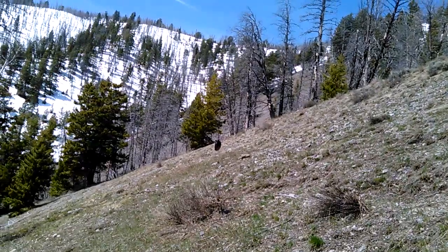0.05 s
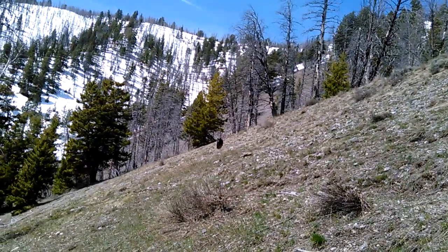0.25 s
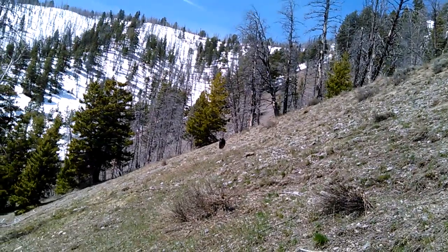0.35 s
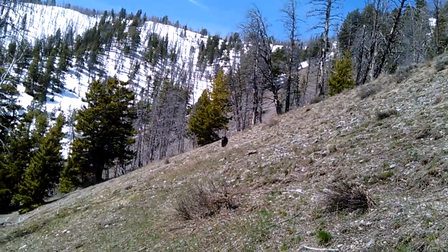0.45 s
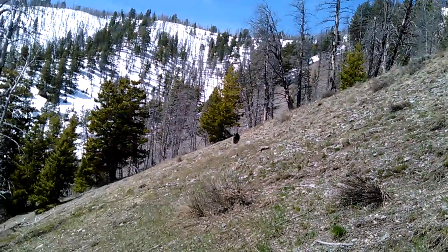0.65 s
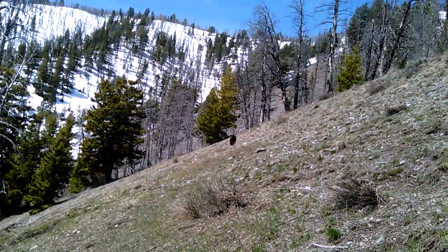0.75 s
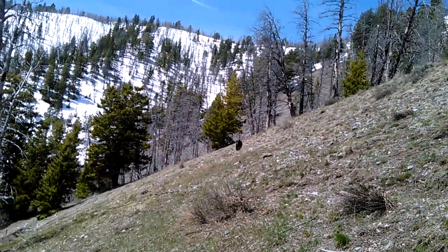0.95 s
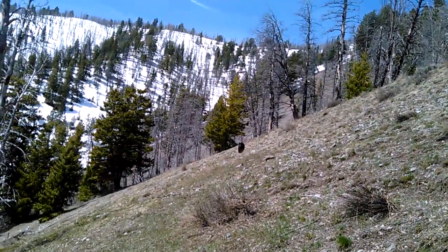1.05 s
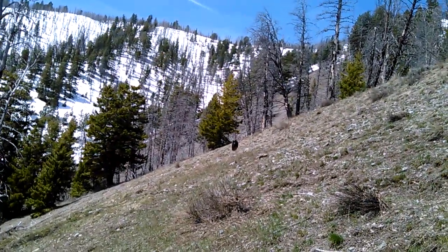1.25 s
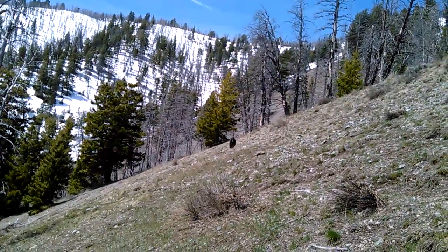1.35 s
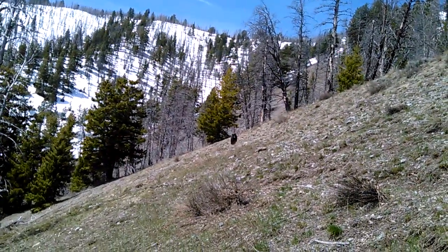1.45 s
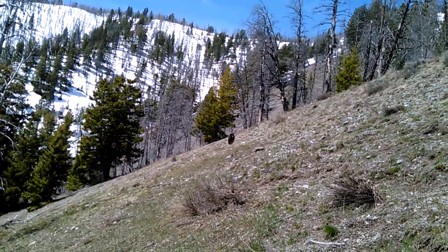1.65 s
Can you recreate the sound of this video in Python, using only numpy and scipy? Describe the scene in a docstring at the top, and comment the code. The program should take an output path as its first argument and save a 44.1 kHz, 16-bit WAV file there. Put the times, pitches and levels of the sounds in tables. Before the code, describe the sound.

Wind buffets the microphone on a mountain slope: a quick cluster of deep thuds, a softer fluttering rumble, then another thump. Far behind it, air hisses softly and a distant bird chirps very faintly toward the end.

```python
"""Wind on a mountainside

Wind rumbles on the microphone, and stronger eddies (swirls of air) thump it. The hardest ones
add a deep thud and a dull tick. Behind this the far air hisses, something dry rustles briefly
and a distant bird gives a few sliding chirps."""
import sys
import numpy as np
from scipy import signal
from scipy.io import wavfile

SR = 44100
rng = np.random.default_rng(int(sys.argv[2]) if len(sys.argv) > 2 else 0)


def store_pcm(level_fs):
    """Save levels as 16-bit WAV."""
    pcm = np.round(np.clip(level_fs, -1, 1) * 32767).astype(np.int16)
    wavfile.write(sys.argv[1], SR, np.atleast_2d(pcm).T)


N = 74970
TIME = np.arange(N) / SR


def wind_rumble():
    """Rough air flowing over the microphone rumbles; a weaker flow is quieter and duller."""
    # strength of the flow (time [s], level [dB])
    flow = [(0, -41), (.025, -33), (.115, -37), (.14, -36), (.25, -26.5), (.34, -24), (.41, -43.5),
            (.445, -36.5), (.485, -37.5), (.59, -35.5), (.66, -33.5), (.84, -32.5), (.93, -36),
            (1.04, -26.5), (1.13, -29.5), (1.185, -42.5), (1.232, -24.5), (1.275, -43), (1.33, -35),
            (1.395, -46), (1.46, -27.5), (1.525, -38.5), (1.6, -33.5), (1.675, -37.5), (1.7, -42.5)]
    # tone of the rumble (frequency [Hz], relative level [dB])
    spectrum = [(30, -22), (39, -11.5), (52, 19.5), (90, -5.5), (160, 2.5), (260, -30.5), (400, -45),
                (650, -42.5), (1200, -56.5)]
    strong_flow_db, flutter_db, upper_hz = -23.5, 4, 300
    flow_db = np.interp(TIME, *np.transpose(flow))
    # bands above upper_hz flutter and follow the flow by this extra amount, lower ones less so
    upper_db = flutter_db * drift(25) + 0.32 * (flow_db - strong_flow_db)
    bands = noise_bands(spectrum, steady=True)
    noise = sum(band * from_db(upper_db * min(hz / upper_hz, 1)) for hz, band in bands)
    return from_db(flow_db + 1) * noise


def eddy_thumps():
    """Each eddy hits the microphone as a short swell of low noise with its own brightness."""
    # eddies (time [s], rise time [s], level [dB], brightness [dB per octave])
    eddies = [(.016, 0.0088, -28, 2.5), (0.07, 0.0033, -36, 1), (0.145, 0.0068, -26, -5),
              (0.179, 0.0045, -21, 0.5), (0.209, 0.0094, -19, 4), (.289, 0.007, -17, 2.7),
              (0.317, 0.011, -21.5, 2.5), (0.348, .003, -18.5, 2), (0.371, 0.0058, -7, 3.5),
              (0.378, 0.003, -15.5, 3.5), (0.403, 0.0058, -20, 0.5), (0.491, 0.0099, -34.5, .5),
              (0.54, 0.011, -32.5, 7.5), (0.633, 0.0059, -22, 0.5), (.687, 0.022, -34, 1.5),
              (0.744, 0.005, -28, -0.5), (0.798, 0.01, -25, -3.5), (0.85, 0.03, -34.5, -0.5),
              (0.988, 0.02, -28, -2.5), (1.076, 0.0054, -21.5, -1), (1.12, 0.0073, -25, 2.5),
              (1.223, 0.015, -30.5, 0), (1.268, 0.0061, -39, 2), (1.426, 0.0046, -25, 0),
              (1.45, 0.013, -18.5, 1.35), (1.474, 0.012, -27.5, 2), (1.567, 0.012, -29.5, -4),
              (1.624, .014, -32.5, -1.5), (1.661, 0.019, -31.5, -8.5)]
    # tone of a thump (frequency [Hz], relative level [dB])
    spectrum = [(30, -25), (45, -8.5), (85, 2), (150, -3), (250, -13), (450, -25), (780, -51),
                (1100, -73.5), (2500, -87.5)]
    # borders between the low, middle and high groups of bands (frequency [Hz])
    borders = [110, 320]
    boost_db, pivot_hz, top_hz = 2.5, 93, 700
    hz, bands = map(np.array, zip(*noise_bands(spectrum, steady=True)))
    octaves = np.log2(np.minimum(hz, top_hz) / pivot_hz)
    groups = np.digitize(hz, borders)
    out = np.zeros(N)
    for at, rise_s, db, brightness in eddies:
        shape = swell(at, rise_s, fall_stretch=1.18)
        gains = from_db(boost_db + db + brightness * octaves)
        for group in np.unique(groups):
            noise = ((groups == group) * gains) @ bands
            # keep the thump's strength the same whatever the noise does at that moment
            power_in_swell = np.average(noise ** 2, weights=shape ** 2)
            out += shape * noise * np.sqrt(np.mean(noise ** 2) / power_in_swell)
    return out


def deep_thuds():
    """A large eddy pushes and pulls the microphone's thin membrane about once."""
    # pressure swings in the hardest eddies (time [s], level [dB], pitch [Hz])
    swings = [(.214, -15.5, 76), (.294, -7.5, 68), (0.382, -5.5, 85.4), (1.43, -13, 65.3),
              (1.457, -12.5, 70)]
    half_length_cycles = 0.7
    out = np.zeros(N)
    for at, db, hz in swings:
        cycles = (TIME - at) * hz
        shape = np.exp(-(cycles / half_length_cycles) ** 2)
        out -= from_db(db) * shape * np.sin(2 * np.pi * cycles)
    return out


def dull_ticks():
    """A sudden kink in air pressure: one low swing that starts sharply and dies at once."""
    # kinks in the hardest eddies (time [s], level [dB], treble cutoff [Hz])
    kinks = [(0.2104, -19, 3500), (0.2867, -15.5, 6000), (.3820, -10, 3800), (0.3971, -19, 3950),
             (1.4423, -23.5, 4920), (1.453, -28.5, 3000)]
    body_hz = 258.3
    out = np.zeros(N)
    for at, db, cutoff_hz in kinks:
        phase = 2 * np.pi * body_hz * np.maximum(TIME - at, 0)
        kink = np.e * phase * (1 - phase / 2) * np.exp(-phase)
        out += from_db(db) * filtered(kink, 2, cutoff_hz, "low")
    return out


def far_air():
    """Wind over the slope and trees makes a smooth hiss."""
    # tone of the hiss (frequency [Hz], relative level [dB])
    spectrum = [(100, -2.5), (500, -2.5), (1000, -2.5), (2000, -10), (3200, -14.5), (5000, -18.5),
                (7800, -20.5), (10500, -22), (14000, -24.5)]
    return from_db(-64) * sum(band for hz, band in noise_bands(spectrum))


def dry_rustle():
    """Faint swishes of high noise, made grainy by a fast flicker in level."""
    # swishes (time [s], rise time [s], level [dB])
    swishes = [(.83, 0.079, -73), (0.94, 0.043, -80), (1.079, 0.027, -75.5), (1.37, 0.024, -78)]
    # tone of the rustle (frequency [Hz], relative level [dB])
    spectrum = [(2500, -10), (5000, 0), (7500, 4.5), (10000, -2), (14000, -18)]
    level = sum(from_db(db) * swell(at, rise_s) for at, rise_s, db in swishes)
    grain = from_db(3 * drift(90))
    return level * grain * sum(band for hz, band in noise_bands(spectrum))


def distant_bird():
    """A bird whistles almost pure notes, each sliding smoothly through three pitches."""
    # notes (time [s], length [s], start [Hz], middle [Hz], end [Hz], relative level [dB])
    chirps = [(1.315, .033, 4250, 3480, 3000, 0), (1.344, .029, 3950, 3020, 2750, -2),
              (1.400, .027, 2500, 3950, 3850, -2.5), (1.589, .052, 3800, 2660, 3200, .5)]
    bird_db, flicker_db = -67.5, 1.2
    out = np.zeros(N)
    for at, length, start_hz, middle_hz, end_hz, db in chirps:
        progress = np.clip((TIME - at) / length, 0, 1)
        curve = np.polyfit([0, .5, 1], [start_hz, middle_hz, end_hz], 2)
        hz = np.polyval(curve, progress)
        level = from_db(bird_db + db + flicker_db * drift(92))
        shape = np.sqrt(np.abs(np.sin(np.pi * progress)))
        out += level * shape * np.sin(2 * np.pi * np.cumsum(hz) / SR)
    return out


def from_db(db):
    """Turn decibels into a number to multiply by."""
    return 10 ** (np.asarray(db) / 20)


def unit_power(x):
    """Scale a wave so that its average power is 1."""
    return x / np.sqrt(np.mean(x ** 2) + 1e-20)


def filtered(x, order, hz, kind):
    """Keep the "low", "high" or "band" part of a wave; a higher order cuts more steeply."""
    return signal.sosfilt(signal.butter(order, hz, kind, fs=SR, output="sos"), x)


def drift(rate_hz):
    """A smooth random wander, typically about 1 in size."""
    step, warm_up = 40, 2000
    memory = np.exp(-2 * np.pi * rate_hz * step / SR)
    noise = rng.standard_normal(N // step + warm_up + 2)
    slow = signal.lfilter([1], [1, -2 * memory, memory ** 2], noise)[warm_up:]
    return np.interp(np.arange(N) / step, np.arange(len(slow)), unit_power(slow))


def noise_bands(spectrum, steady=False):
    """Give half-octave slices of noise as (centre [Hz], wave); their powers add up to 1."""
    hz, db = np.transpose(spectrum)
    edges = 20 * 2 ** np.arange(0, 9.6, .5)
    centres = np.sqrt(edges[1:] * edges[:-1])
    power = from_db(np.interp(np.log(centres), np.log(hz), db)) ** 2 * np.diff(edges)
    power *= (edges[1:] > hz[0]) & (edges[:-1] < hz[-1])
    for k in np.flatnonzero(power):
        band = filtered(rng.standard_normal(2 * N), 2, edges[k:k + 2], "band")
        if steady:  # flatten the noise's own swells
            band = band / np.abs(signal.hilbert(band))
        band = filtered(band, 4, min(edges[k + 1] * 1.4, .45 * SR), "low")
        yield centres[k], np.sqrt(power[k] / power.sum()) * unit_power(band[N // 2:N // 2 + N])


def swell(peak_s, rise_s, fall_stretch=1):
    """A quick rounded rise to a peak, then a fall with a longer tail."""
    offset = np.clip((TIME - peak_s) / rise_s, -6, 12)
    return np.where(offset < 0, np.exp(-offset ** 2), 1 / np.cosh(np.pi / 2 * offset / fall_stretch))


def scene():
    """Wind on the microphone in front of the quiet slope, in one channel."""
    wind = wind_rumble() + eddy_thumps() + deep_thuds() + dull_ticks()
    return (wind + far_air() + dry_rustle() + distant_bird())[None]


def record(dry):
    """Turn down the deepest bass, round off the peaks and cut the highest treble."""
    bass_hz, ceiling, treble_hz = 33, 1.1, 14350
    x = filtered(dry, 4, bass_hz, "high")
    x = ceiling * np.tanh(x / ceiling)
    return signal.sosfilt(signal.ellip(10, .2, 70, treble_hz, fs=SR, output="sos"), x)


dry = scene()
out = record(dry)
store_pcm(out)
```